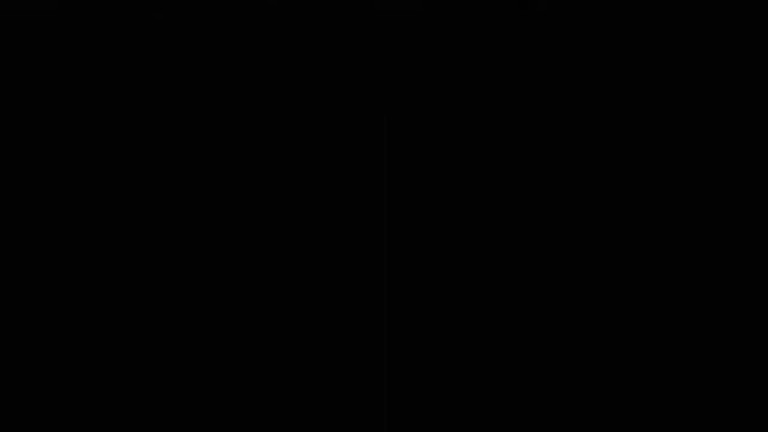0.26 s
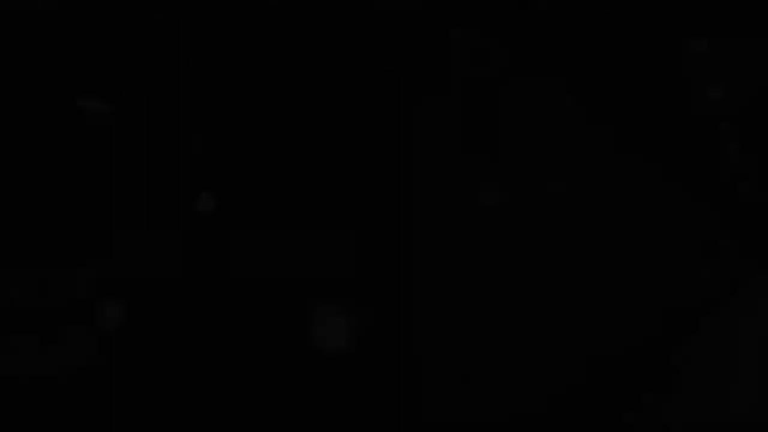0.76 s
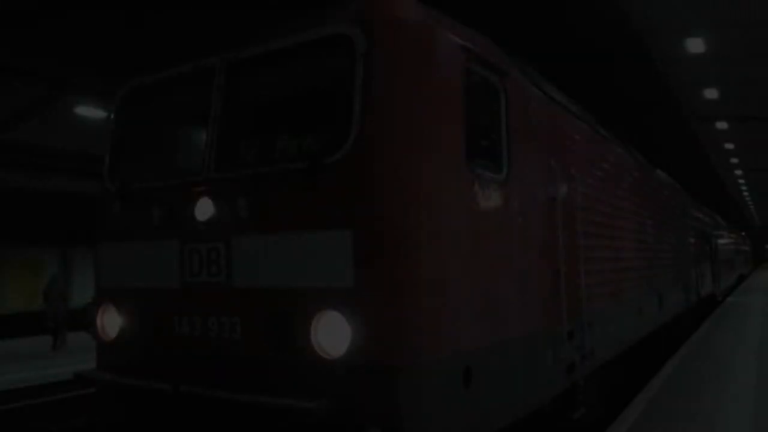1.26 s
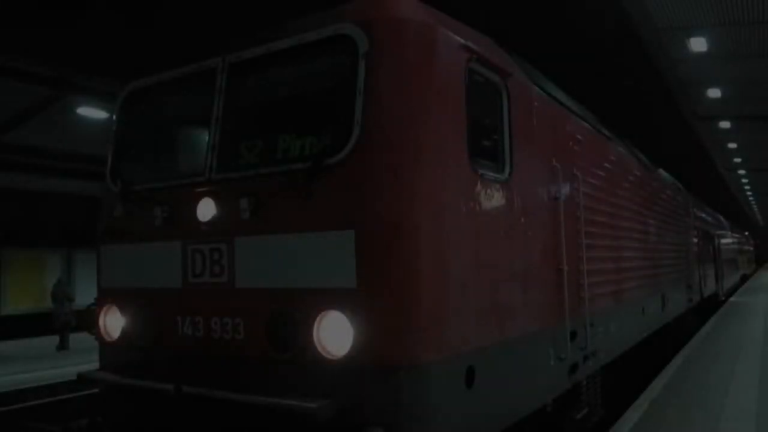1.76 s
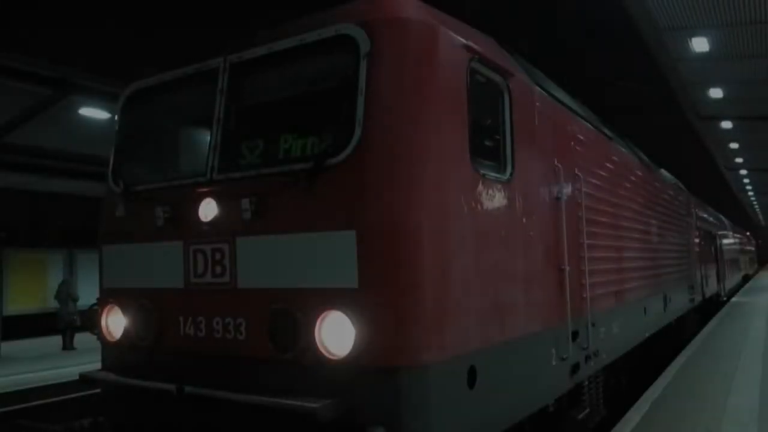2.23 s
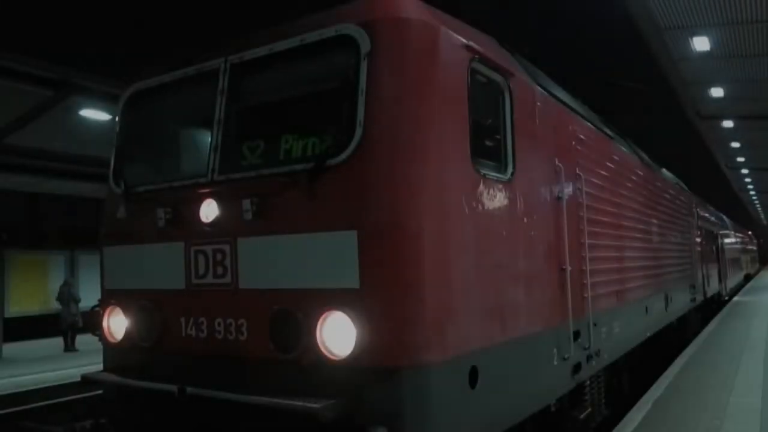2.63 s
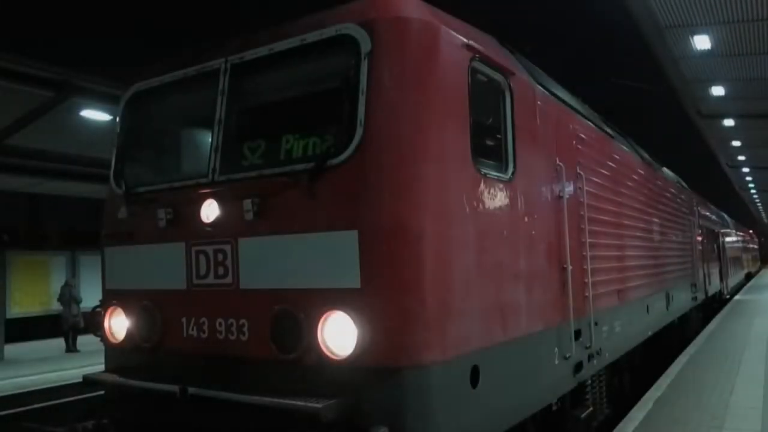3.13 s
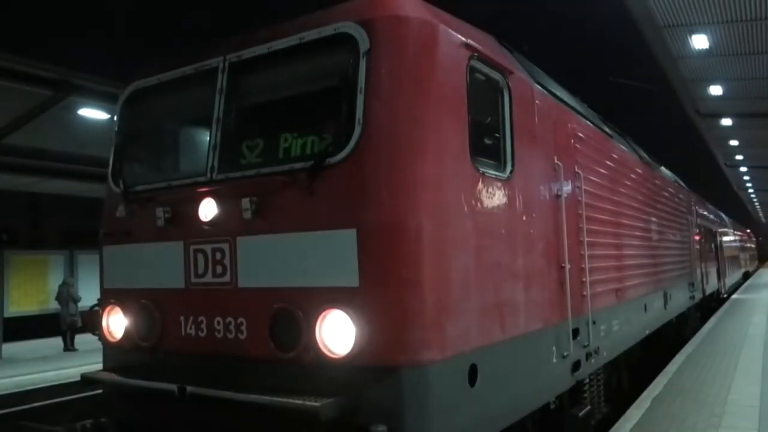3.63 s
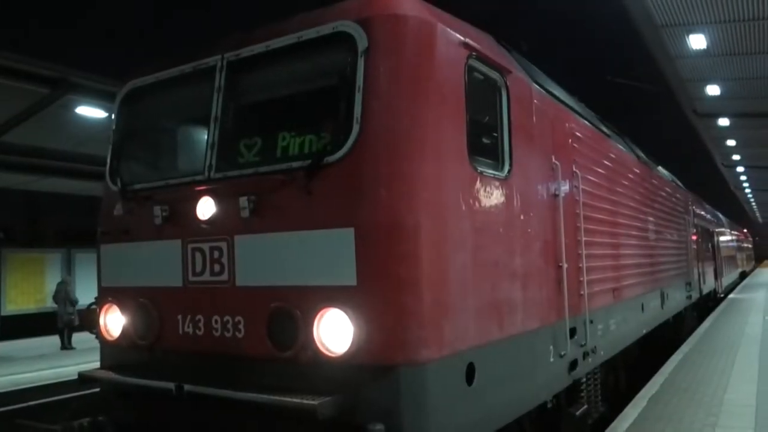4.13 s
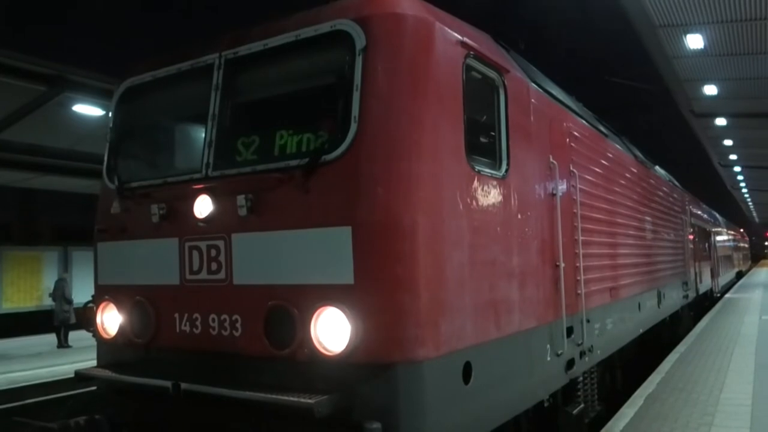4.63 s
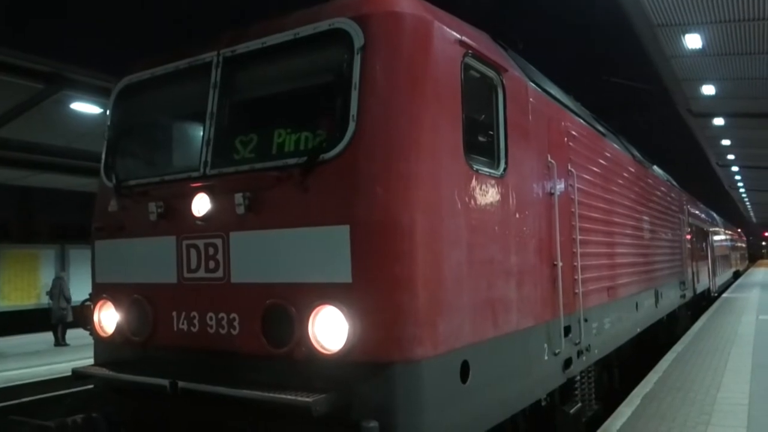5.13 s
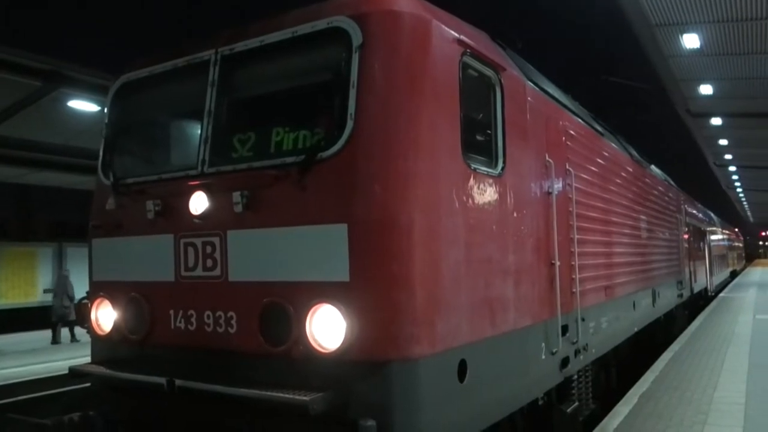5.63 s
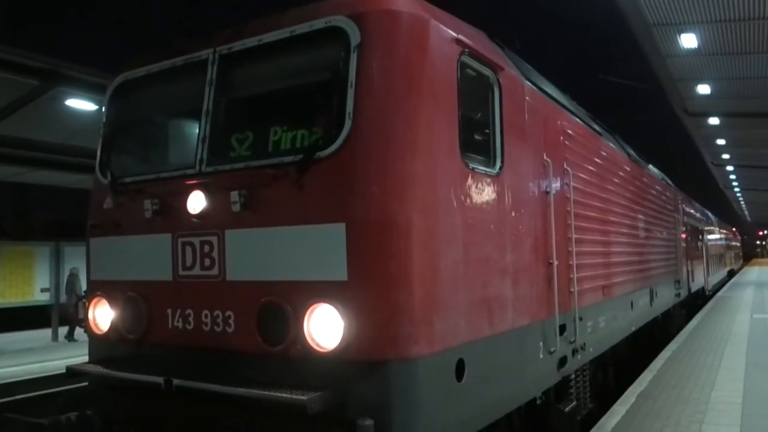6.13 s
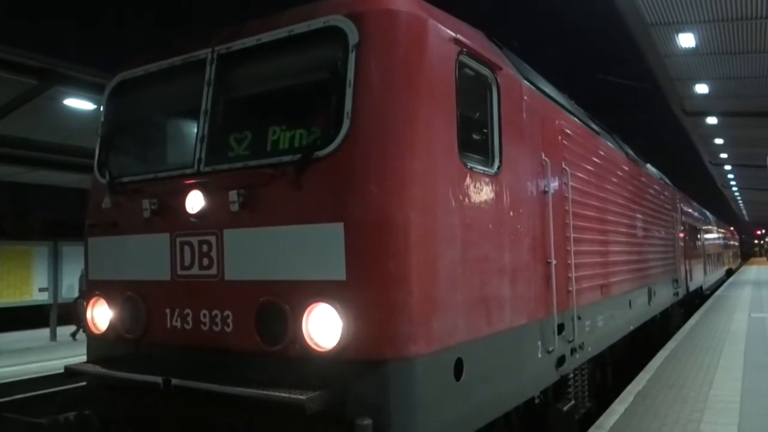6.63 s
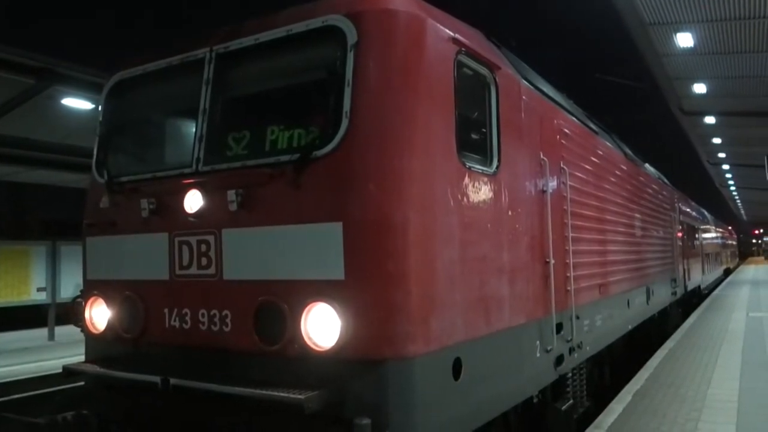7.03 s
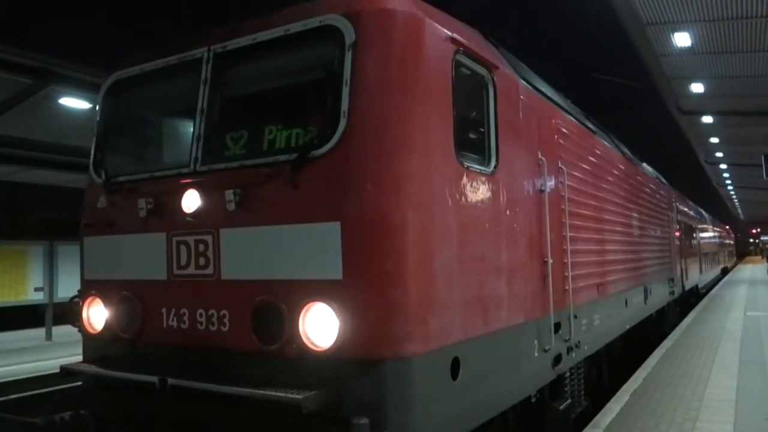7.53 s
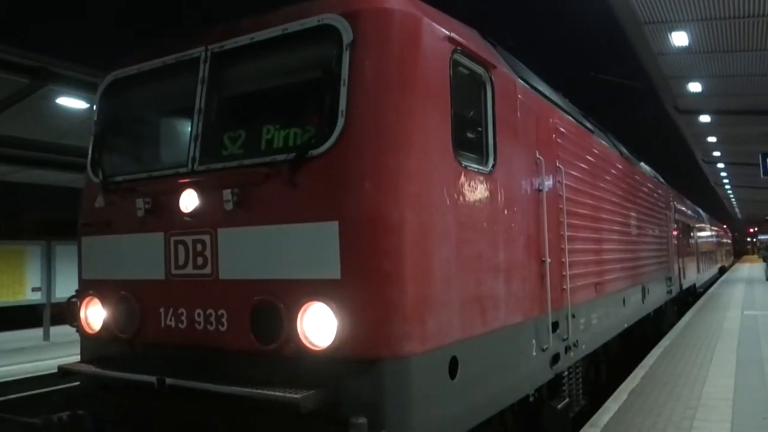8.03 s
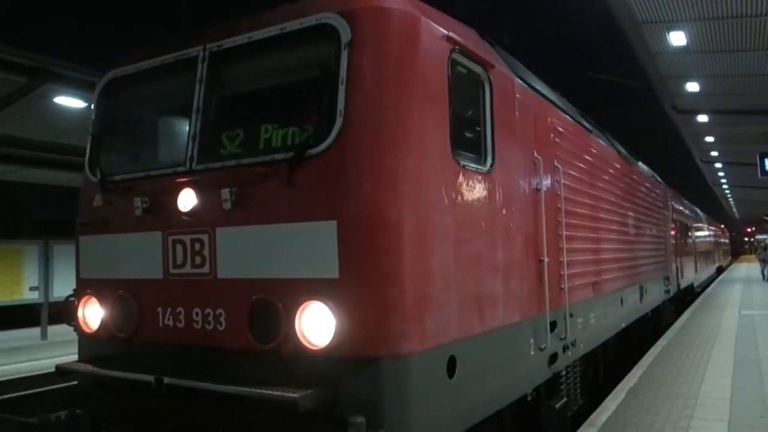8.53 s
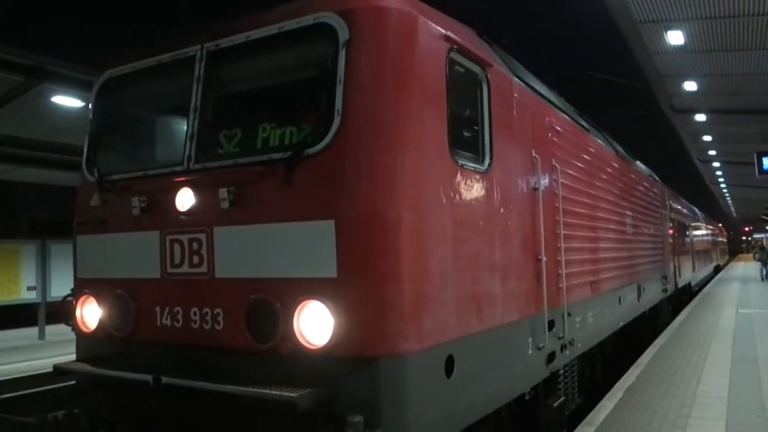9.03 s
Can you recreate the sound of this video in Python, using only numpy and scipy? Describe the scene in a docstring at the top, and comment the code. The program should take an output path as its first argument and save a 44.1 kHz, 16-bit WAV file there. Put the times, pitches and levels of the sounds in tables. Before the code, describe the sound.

Cooling blowers on a stationary electric locomotive fade in with an airy roar and a faint hum, heard from close by on a covered platform. Almost at once, compressed air starts jetting from a valve in a sharp, unbroken hiss that dominates. As the pressure sinks, the hiss softens slightly and takes on a faint pipe ring, while the blowers grow more noticeable. The microphone keeps the overall loudness even.

```python
"""Under a platform roof: an electric locomotive stands, cooling blowers roaring with a faint fan hum.
At 2 s an air valve opens and hisses on while its pressure slowly sinks.
A hand-held camera's gain control pushes the blowers down under the hiss and lets them back.
The sound fades in."""
import sys
import numpy as np
from scipy import signal
from scipy.fft import rfft, irfft
from scipy.io import wavfile

SR = 44100
rng = np.random.default_rng(int(sys.argv[2]) if len(sys.argv) > 2 else 0)


def wav_record(signal):
    """Record a signal, one row per channel, as 16-bit PCM in the file named by sys.argv[1]."""
    frames = np.transpose(np.atleast_2d(signal))
    bounded = np.clip(frames, -1, 1)
    # unit amplitude maps onto the largest positive 16-bit level
    quanta = np.round(bounded * 32767).astype(np.int16)
    wavfile.write(sys.argv[1], SR, quanta)


N = 408807
TIME, HZ = np.arange(N) / SR, np.fft.rfftfreq(N, 1 / SR)


def gain_of(db):
    """dB to amplitude."""
    return 10 ** (np.asarray(db) / 20)


def unit_rms(x):
    """Scale to rms 1."""
    return x / np.sqrt(np.mean(x ** 2) + 1e-20)


def over_hz(rows):
    """Interpolate (f/Hz, value) rows over log frequency."""
    f_hz, value = np.transpose(rows)
    return np.interp(np.log(HZ + 1), np.log(f_hz + 1), value)


def lift_db(modes):
    """Bell-shaped spectral peaks of resonances."""
    return sum(db / (1 + (2 * (HZ - f_hz) / width_hz) ** 2) for f_hz, width_hz, db in modes)


def wander(rate_hz):
    """Slow random drift, rms 1, bandwidth about rate_hz."""
    frames = N // 256 + 2
    f_hz = np.fft.rfftfreq(frames, N / SR / frames)
    spectrum = rfft(rng.standard_normal(frames)) * np.exp(-(f_hz / rate_hz) ** 2)
    return np.interp(TIME, np.linspace(0, N / SR, frames), unit_rms(irfft(spectrum, frames)))


def lag(x, tau_s):
    """One-pole smoothing."""
    pole = np.exp(-1 / (tau_s * SR))
    return signal.lfilter([1 - pole], [1, -pole], x)


def turbulence(shape_db):
    """Shaped air noise, rms 1, partly coherent at the two microphones."""
    # left-right likeness: f/Hz, correlation
    likeness = [(20, .65), (70, .75), (140, 0.99), (300, 0.91), (550, 0.88), (1400, 0.77), (3000, 0.68),
                (5200, 0.72), (6600, 0.99), (7800, 1), (8300, 0.86), (8900, .83), (9400, 1), (15000, 0.98)]
    correlation = np.clip(over_hz(likeness), 0, 1)
    shared, apart = rfft(rng.standard_normal((2, N)))
    mid, side = shared * np.sqrt(1 + correlation), apart * np.sqrt(1 - correlation)
    return unit_rms(irfft(np.array([mid + side, mid - side]) * gain_of(shape_db), N))


def blowers(level_db=-30.5, surge_db=0.3):
    """Cooling air roars through ringing ducts, surging a little."""
    # airflow spectrum: f/Hz, relative density/dB
    rush = [(20, -23), (50, -13.5), (95, -14.5), (135, -1.5), (380, -3.5), (780, -3), (1100, -1),
            (1550, -4), (1950, -9.5), (2500, -9.5), (3500, -14.5), (5500, -29.5), (9000, -28.5),
            (15500, -47)]
    # duct and louvre resonances: f/Hz, width/Hz, lift/dB
    ducts = [(197, 57, 7.5), (251, 39, 6.5), (318, 24, 6), (436, 43, 7.5), (566, 27, 4.5), (608.2, 30, 10),
             (652.5, 16.5, 8.5), (695, 17, 4), (910, 16, 1.5), (1450, 46, 5), (1552, 40, 3.5),
             (1747, 37, 5)]
    roar = turbulence(over_hz(rush) + lift_db(ducts))
    return roar * gain_of(level_db + surge_db * wander(rate_hz=4.2))


def fan_hum(blade_hz=430.4, waver_hz=3.82, trim_db=-3, octave_db=-49.5, flutter_db=1.5, swell_db=1.5):
    """The blade tone wavers, swells and flutters in the draught, with a faint octave."""
    # blade tone envelope: t/s, relative level/dB
    blade_level = [(1.2, -45.5), (1.67, -41), (2.1, -47), (2.32, -30), (2.6, -39), (3.4, -41), (3.87, -35),
                   (4.2, -43.5), (4.8, -31.5), (5.2, -42), (6.0, -43), (6.34, -37), (6.8, -40), (7.11, -38),
                   (7.5, -48), (8.22, -43), (9.26, -44)]
    blade_db = np.interp(TIME, *np.transpose(blade_level)) + trim_db
    blade_cycles = np.cumsum(blade_hz + waver_hz * wander(rate_hz=12.1)) / SR
    octave_cycles = np.cumsum(2 * blade_hz + waver_hz * wander(rate_hz=19.5)) / SR
    draught_db = flutter_db * wander(rate_hz=18) + swell_db * wander(rate_hz=3.7)
    blade = gain_of(blade_db + draught_db) * np.sin(2 * np.pi * blade_cycles)
    octave = gain_of(octave_db + flutter_db * wander(rate_hz=8)) * np.sin(2 * np.pi * octave_cycles)
    return np.sqrt(2) * (blade + octave)


def air_valve(opens_s=2.008, travel_s=0.063, hold_s=0.94, level_db=-23, sink_db_per_s=0.92,
              flutter_db=0.18):
    """Compressed air jets out; as pressure sinks it weakens, dulls and rings more in the pipe."""
    # jet spectrum: f/Hz, relative density/dB
    jet_shape = [(200, -11.5), (900, -13), (2000, -9.5), (3000, -5), (4500, -5), (5100, -3.5), (7100, -5),
                 (8400, -4), (10300, -0.5), (11500, -3), (13400, -5), (14000, -7), (15600, -9)]
    open_s = np.maximum(TIME - opens_s, 0)
    sinking_s = np.maximum(open_s - hold_s, 0)
    jet = turbulence(over_hz(jet_shape))
    jet = jet + pipe_ring(jet, open_s)
    hiss = reflections(sizzle(jet, open_s, sinking_s))
    opening = np.minimum(open_s / travel_s, 1)
    hiss_db = level_db - sink_db_per_s * sinking_s + flutter_db * wander(rate_hz=11)
    return hiss * opening * gain_of(hiss_db)


def pipe_ring(jet, open_s, share=0.5, growth_per_s=0.13):
    """The jet excites narrow resonances, more as pressure falls."""
    # valve and pipe resonances: f/Hz, width/Hz, lift at share 1/dB
    pipe = [(2290, 61, 5.5), (2600, 30, 2.5), (2750, 25, 5.5), (3970, 23, 4), (4175, 94, 3), (4800, 67, 4),
            (5160, 28, 6), (5560, 26, 4.5), (5950, 22, 2.5), (7670, 120, 4), (8140, 30, 3.5), (8850, 96, 3),
            (10680, 220, 3)]
    ringing = irfft(rfft(jet) * (gain_of(lift_db(pipe)) - 1), N)
    return ringing * (share + growth_per_s * open_s)


def sizzle(jet, open_s, sinking_s, corner_hz=9000, boost_db=1.46, build_db=2, build_s=0.44,
           sink_db_per_s=0.44, flutter_db=0.6, sway_db=0.36):
    """The finest, least steady eddies make the jet's treble: it swells, flickers, then dulls."""
    treble = irfft(rfft(jet) / (1 + (corner_hz / (HZ + 1)) ** 8), N)
    trend_db = boost_db - build_db * np.exp(-open_s / build_s) - sink_db_per_s * sinking_s
    flicker_db = flutter_db * wander(rate_hz=11) + sway_db * wander(rate_hz=3)
    return jet + treble * (gain_of(trend_db + flicker_db) - 1)


def reflections(direct, echo_db=-8.5, decay_s=0.024, spots=3):
    """Echoes off body, platform and roof comb the noise; the ripples drift as the camera sways."""
    spectrum, total = rfft(direct), direct
    position = np.linspace(0, spots - 1, N)
    for spot in range(spots):
        delays_s = rng.uniform(.001, .06, size=120)
        taps = np.zeros(N)
        taps[(delays_s * SR).astype(int)] = rng.choice([-1, 1], 120) * np.exp(-delays_s / decay_s)
        echoes = irfft(spectrum * rfft(taps), N) / np.linalg.norm(taps)
        nearness = np.cos(np.pi / 2 * np.clip(position - spot, -1, 1))
        total = total + gain_of(echo_db) * nearness * echoes
    return unit_rms(total)


def scene():
    """Blowers, hum and hiss, leaning towards the locomotive's flank on the right."""
    # stereo balance: f/Hz, left minus right/dB
    lean = [(40, -24), (110, -3.5), (350, -4), (700, -1.8), (2400, -2.5), (4800, -3), (6000, 0),
            (7800, -.2), (9300, -2), (10700, -4.5), (11900, -2), (15000, -2.5)]
    # phase between microphones: f/Hz, left lead/rad
    lead = [(1200, 0.18), (3000, 0.092), (5200, 0.32), (6600, 0)]
    sound = blowers() + fan_hum() + air_valve()
    left = gain_of(over_hz(lean) / 2) * np.exp(.5j * over_hz(lead))
    pan = np.array([left, 1 / left])
    pan /= np.sqrt(np.mean(abs(pan) ** 2, axis=0))  # constant power
    return irfft(rfft(sound) * pan, N)


def record(dry, ceiling_db=-30.5, sense_s=0.012, settle_s=0.017, fade_from_s=0.73, fade_to_s=3.84,
           cutoff_hz=15760):
    """Gain control holds the loudness steady; then fade-in and low-pass."""
    power_db = 10 * np.log10(lag(np.mean(dry ** 2, axis=0), sense_s) + 1e-12)
    reduction_db = lag(np.maximum(power_db - ceiling_db, 0), settle_s)
    held = dry / gain_of(reduction_db)
    fade = np.clip((TIME - fade_from_s) / (fade_to_s - fade_from_s), 0, 1)
    lowpass = signal.firwin(1023, cutoff_hz, window=("kaiser", 9), fs=SR)
    return signal.oaconvolve(held * fade, lowpass[None], "same", axes=1)


dry = scene()
out = record(dry)
wav_record(out)
```